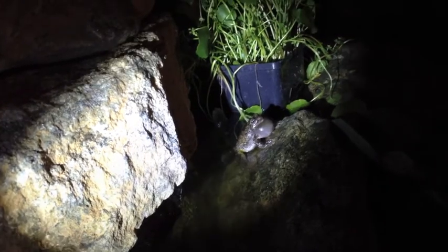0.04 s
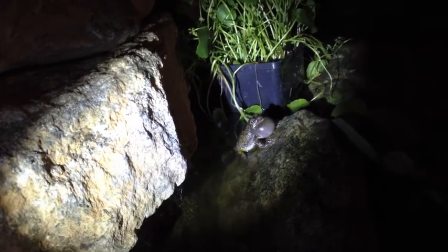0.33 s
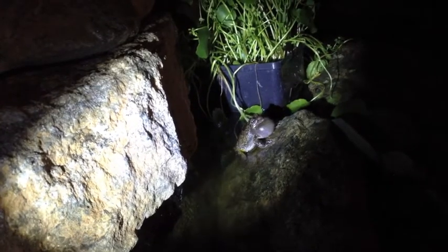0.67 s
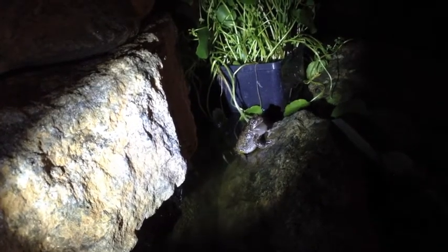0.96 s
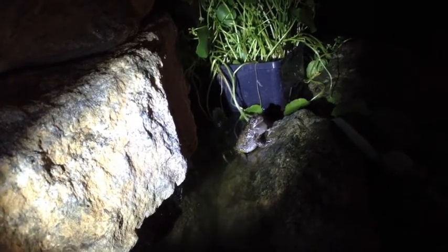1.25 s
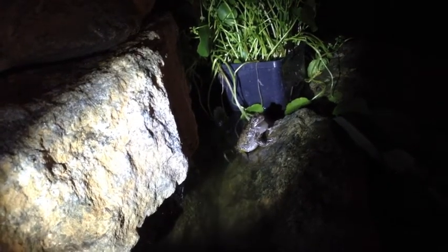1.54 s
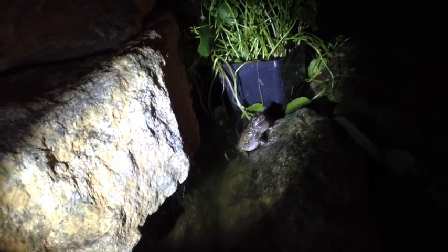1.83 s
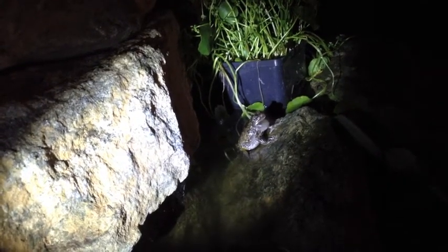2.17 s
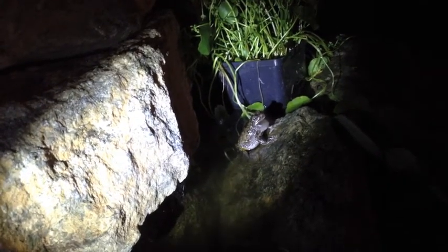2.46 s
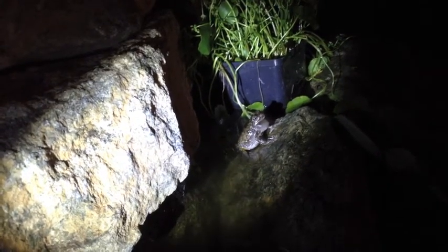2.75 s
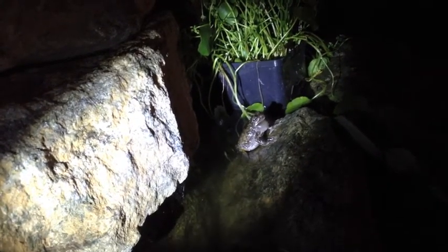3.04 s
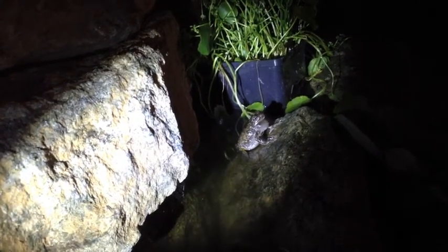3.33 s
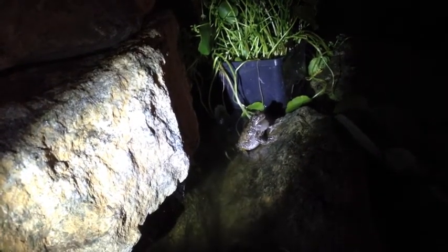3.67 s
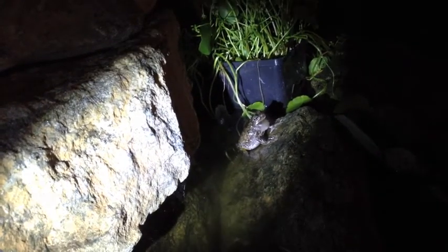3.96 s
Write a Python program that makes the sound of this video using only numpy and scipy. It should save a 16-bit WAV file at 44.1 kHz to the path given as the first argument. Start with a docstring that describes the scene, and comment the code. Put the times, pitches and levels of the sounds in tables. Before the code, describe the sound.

A frog trills loudly close by, two others join, then faint water keeps trickling.

```python
"""Among rocks in a garden at night, on one microphone: a treefrog trills close by, and two farther off
join in and outlast it. Each trill is a train of short pulses, about 48 a second, each an upward chirp
of the vocal cords, its overtones shaped by throat and vocal sac and mirrored by the stones.
Behind the frogs, water trickles, plops and drips faintly in a stony hollow throughout."""
import sys
import numpy as np
from scipy import signal
from scipy.fft import rfft, irfft
from scipy.io import wavfile
from scipy.ndimage import uniform_filter1d

SR = 44100
rng = np.random.default_rng(int(sys.argv[2]) if len(sys.argv) > 2 else 0)


def waveform_to_disk(signal):
    """Save audio, clipped to [-1, 1], as 16-bit WAV at the path in sys.argv[1]."""
    frames = np.transpose(np.atleast_2d(signal))
    scaled = np.clip(frames, -1, 1) * 32767
    samples = np.round(scaled).astype(np.int16)
    wavfile.write(sys.argv[1], SR, samples)


N = 176400


def near_frog():
    """The loud frog close to the microphone, first to call."""
    # Pulse timing and glide (start/s, count; the rest in ms or Hz as named)
    call = dict(start=-.0011, period_ms=20.2, slowing_ms=.045, count=32, late_ms=0, from_hz=1088, to_hz=1404, attack_ms=3.37, hold_ms=7.6, release_ms=.7)
    # Effort through the trill (t/s, level/dB)
    effort = [(0, -18.5), (0.022, -5.5), (0.041, -3), (.13, -4), (.42, -7), (.53, -8), (.65, -6)]
    # Response of throat and vocal sac (f/Hz, level/dB)
    throat = [(830, -35.5), (1020, -14), (1200, -19.5), (1400, -12.5), (1850, -4), (2150, -0.5),
              (2800, -1.5), (3080, -45.5), (3350, -35), (3680, -15), (4300, -40.5), (5000, -24.5),
              (5900, -23), (6200, -35.5), (7050, -26.5), (8400, -29), (9200, -41), (10500, -43),
              (12900, -58.5), (13900, -35.5), (14600, -55.5)]
    # Reflections off the nearest stones (delay/ms, share)
    stones = [(3.64, .48), (4.29, .4)]
    return stone_echoes(trill(call, effort, throat, rasp_db=-26.5, body_db=-25), stones)


def high_frog():
    """A higher, quicker frog farther off, second to call."""
    # Pulse timing and glide (start/s, count; the rest in ms or Hz as named)
    call = dict(start=.3145, period_ms=19.6, slowing_ms=.014, count=38, late_ms=0, from_hz=1190, to_hz=1469.5, attack_ms=1.5, hold_ms=8.04, release_ms=0.49)
    # Effort through the trill (t/s, level/dB)
    effort = [(.31, -18.5), (0.379, -17.5), (.62, -17.5), (.7, -19.5), (.97, -18), (1.05, -19)]
    # Response of throat and vocal sac (f/Hz, level/dB)
    throat = [(900, -26), (1150, -14), (1350, 0), (1500, 3), (1780, -17.5), (2300, -3), (2900, 3.5),
              (3330, -32), (3900, -16.5), (4600, -25.5), (5300, -46), (7000, -57), (8600, -48.5),
              (9100, -23), (9700, -83.5)]
    # Reflections off the nearest stones (delay/ms, share)
    stones = [(2.3, 0.13), (8.2, 0.082)]
    return stone_echoes(trill(call, effort, throat, rasp_db=-48, body_db=-46), stones)


def low_frog():
    """A lower, slower frog, also farther off, last to start and stop."""
    # Pulse timing and glide (start/s, count; the rest in ms or Hz as named)
    call = dict(start=.4794, period_ms=21.5, slowing_ms=.045, count=33, late_ms=6.6, from_hz=1026, to_hz=1364, attack_ms=3.28, hold_ms=8.2, release_ms=1.1)
    # Effort through the trill (t/s, level/dB)
    effort = [(0.479, -20), (.7, -21.5), (.8, -19), (1.1, -18.5), (1.17, -16.5), (1.197, -24)]
    # Response of throat and vocal sac (f/Hz, level/dB)
    throat = [(850, -34.5), (1100, -8), (1350, 1), (1770, -27), (2100, 1), (2700, 1), (3170, -42),
              (3700, -12.5), (4500, -35), (5000, -31.5), (6000, -48), (7700, -46.5), (8250, -34),
              (9000, -64)]
    # Reflections off the nearest stones (delay/ms, share)
    stones = [(2.205, 0.43), (10.588, 0.12)]
    return stone_echoes(trill(call, effort, throat, rasp_db=-37.5, body_db=-58), stones)


def trill(call, effort, throat, rasp_db, body_db):
    """A slowly slackening train of pulses; in each the vocal cords start, glide upward and stop."""
    # Spectrum of the turbulent rasp within each pulse (f/Hz, level/dB)
    turbulence = [(200, -34), (830, -22), (1000, -4), (1650, 3), (2600, -6), (3150, -19.5), (3800, -4.5),
                  (8400, -14.5), (10000, -28), (15000, -37)]
    glide_ms, body_hz, body_decay_ms = 10.6, 1052, 5.2
    k = np.arange(call["count"])
    jitter_ms, detune, jitter_db = (rng.standard_normal((len(k), 3)) * [.051, .011, .72]).T
    cold = np.exp(-k / 2.18)  # until the frog warms up, pulses are flat in pitch and open late
    beats_ms = call["period_ms"] * k + call["slowing_ms"] * k ** 2 / 2 + jitter_ms
    beats_ms[-1] += call["late_ms"]
    onsets = call["start"] + beats_ms / 1000
    t = np.arange(int((onsets[-1] + .02) * SR)) / SR
    pulse = np.maximum(np.searchsorted(onsets, t) - 1, 0)
    age_ms = np.maximum(t - onsets[pulse], 0) * 1000

    glide = np.interp(age_ms, [0, glide_ms], [call["from_hz"], call["to_hz"]])
    hz = glide * (1 - .11 * cold + detune)[pulse]
    turns = np.cumsum(hz) / SR
    phase = 2 * np.pi * (turns - np.interp(onsets, t, turns)[pulse])  # restarts with each pulse

    size = undb(curve(onsets, effort) + jitter_db)[pulse]
    open_ms = age_ms - 3.6 * cold[pulse] ** 2
    opening = size * np.sin(np.pi / 2 * np.clip(open_ms / call["attack_ms"], 0, 1)) ** 2
    closing_ms = np.logaddexp(0, 3 * (age_ms - call["hold_ms"])) / 3
    drive = opening * np.exp(-closing_ms / call["release_ms"])

    tone = drive * sum(np.sin(n * phase) for n in range(1, 4))
    harsh = undb(1.5 * (np.exp(-((age_ms - 6.5) / 1.24) ** 2) - 1.5))  # a brief lift 6.5 ms in
    flutter = .11 * walk(per_s=1800)[:len(t)]  # the cords flutter and roughen the high overtones
    buzz = drive * harsh * sum(np.sin(n * (phase + flutter)) for n in range(4, 13))
    ring = undb(-10) * tail(buzz, t60_s=.06)[:len(t)]  # they ring on between pulses
    sac = shaped(tone + buzz + ring, throat)
    rasp = undb(rasp_db) * drive * colour(rng.standard_normal(N), turbulence)[:len(t)]
    # Each pulse also sets the frog's body ringing
    body_ring = np.exp(1 - age_ms / body_decay_ms) * np.sin(2 * np.pi * body_hz * age_ms / 1000)
    body = undb(body_db) * opening * body_ring
    return sac + np.pad(rasp + body, (0, N - len(t)))


def stone_echoes(x, echoes):
    """The direct sound plus delayed copies off small stones, which return little bass or treble."""
    low_hz, high_hz = 1463, 5460
    hz = np.arange(N + 1) * SR / (2 * N)
    returned = hz ** 4 / (hz ** 4 + low_hz ** 4) / (1 + (hz / high_hz) ** 4)
    copies = sum(share * np.exp(-2j * np.pi * hz * ms / 1000) for ms, share in echoes)
    return irfft(rfft(x, 2 * N) * (1 + returned * copies), 2 * N)[:N]


def trickle():
    """Water behind the frogs: wash and spray, with bubbles and drips that ring in a stony hollow."""
    # Loudness of the water over time, dipping a little and then slowly rising (t/s, level/dB)
    water_levels = [(0, -0.36), (1.4, -2.07), (2.3, -0.48), (3.3, 0.57), (4, 2)]
    water_gain = undb(curve(np.arange(N) / SR, water_levels))
    hiss = water_gain * (wash() + spray())
    drops = water_gain * small_bubbles() + plops() + drips()
    hollow = undb(-2) * tail(drops, t60_s=.063)
    return hiss + drops + gurgle(drops) + hollow


def plops():
    """Single bubbles that stand clear of the trickle."""
    # Plops (t/s, relative level/dB, f/Hz)
    events = [(.147, -31, 700), (.28, -33, 715), (1.311, -37, 756), (2.023, -41.5, 763), (2.28, -31, 1380),
              (2.294, -38.5, 765), (2.337, -34.5, 772), (2.577, -40.5, 710), (2.598, -35.5, 720),
              (2.656, -37.5, 1440), (2.895, -38, 1050), (3.016, -38.5, 754), (3.06, -39.5, 775),
              (3.14, -36, 708), (3.18, -38, 834), (3.226, -40, 785), (3.3, -39.5, 755), (3.345, -34.5, 712),
              (3.58, -28, 2600), (3.67, -37, 660), (3.693, -36.5, 783), (3.759, -40, 790),
              (3.878, -35, 1510), (3.924, -27.5, 2480)]
    return undb(-2) * bubbles(events)


def small_bubbles():
    """Faint bubbles at random times in three pitch ranges, a few much louder than the rest."""
    # Bubble swarms (rate/s^-1, lowest f/Hz, highest f/Hz, base level/dB)
    swarms = [(40, 660, 980, -56), (85, 1300, 2600, -57), (60, 1900, 4600, -53)]
    out = np.zeros(N)
    for rate, low_hz, high_hz, base_db in swarms:
        when, pitch, size = rng.random(size=(600, 3))[:int(rate * N / SR)].T
        db = base_db - 3.8 * np.log(np.maximum(size, .05))
        out += bubbles(zip(when * N / SR, db, low_hz * (high_hz / low_hz) ** pitch))
    return out


def bubbles(rows):
    """Each bubble (t/s, level/dB, f/Hz) rings for a few cycles and rises in pitch."""
    decay_cycles, rise, attack_s = 5.63, .019, .001
    out, t = np.zeros(N + SR), np.arange(SR // 12) / SR
    for start, db, hz in rows:
        life = t * hz / decay_cycles
        envelope = (1 - np.exp(-t / attack_s)) * np.exp(-life)
        phase = 2 * np.pi * hz * t * (1 + rise * (np.minimum(life, 10) - 1) / 2)
        i = int(max(start, 0) * SR)
        out[i:i + len(t)] += undb(db) * envelope * np.sin(phase)
    return out[:N]


def drips():
    """Each drip smacks on wet stone: a band of noise that dies in a few milliseconds."""
    # Drips (t/s, level/dB, centre f/Hz)
    events = [(1.384, -48.5, 11000), (1.522, -45, 4740), (1.692, -43, 2170), (1.853, -45.5, 3900),
              (2.022, -44.5, 2900), (2.122, -42.5, 3880), (2.258, -41.5, 5300), (2.819, -44.5, 2460),
              (2.987, -42.5, 4500), (3.239, -43, 2270), (3.301, -43, 2840), (3.687, -44, 3670),
              (3.76, -42.5, 2280), (3.852, -45.5, 5950), (3.88, -38, 5500)]
    attack_s, decay_s, width_hz = .0008, .005, 1500
    out, t = np.zeros(N + SR), np.arange(SR // 20) / SR
    hz = np.fft.rfftfreq(len(t), 1 / SR)
    envelope = (1 - np.exp(-t / attack_s)) * np.exp(-t / decay_s)
    for start, db, centre in events:
        band = hz / (hz + centre) * np.exp(-((hz - centre) / width_hz) ** 2 / 2)
        smack = irfft(rfft(rng.standard_normal(len(t))) * band, len(t))
        i = int(start * SR)
        out[i:i + len(t)] += undb(db) * envelope * smack / np.std(smack)
    return out[:N]


def gurgle(drops):
    """A cavity among the stones booms on after each plop and joins them into a gurgle."""
    cavity_hz, width_hz = 780, 130
    cavity = signal.lfilter(*signal.iirpeak(cavity_hz, cavity_hz / width_hz, fs=SR), drops)
    return undb(-5) * tail(cavity, t60_s=.17)


def wash():
    """The steady noise of running water, its level flickering slightly."""
    # Spectrum of the wash (f/Hz, level/dB)
    spectrum = [(24, -58), (40, -36.5), (103, -4.5), (200, -5.5), (562, -4), (758, 0), (1020, -3),
                (1190, -16.5), (1410, 1), (1860, -15), (2110, -5), (2710, -10), (3300, -10), (3620, -5.5),
                (5440, -10.5), (8310, -9), (9890, -16.5), (14400, -16.5), (15500, -39)]
    return undb(-52.5 + 1.5 * walk(per_s=18)) * colour(rng.standard_normal(N), spectrum)


def spray():
    """Tiny splashes at random times, each a short burst of noise."""
    # Spectrum of the spray (f/Hz, level/dB)
    spectrum = [(500, -8.5), (1400, 1), (2500, -2), (3300, 1), (3620, 5.5), (4500, -5.5), (4950, 4),
                (5700, -5.5), (6700, 1.5), (8400, -0.5), (10000, -8), (15000, -13)]
    per_s, spread_db, decay_s = 280, 3.7, .004
    hits = rng.random(N) < per_s / SR
    splashes = hits * undb(spread_db * np.minimum(rng.exponential(size=N), 4))
    power = signal.lfilter([1], [1, -np.exp(-2 / (decay_s * SR))], splashes ** 2)
    return undb(-57) * colour(np.sqrt(power) * rng.standard_normal(N), spectrum)


def tail(x, t60_s):
    """Diffuse reflections or ringing, dying by 60 dB in t60_s."""
    t = np.arange(SR // 2) / SR
    envelope = np.exp(-np.log(1000) * t / t60_s) * np.minimum(10 * t / t60_s, 1)
    response = rng.standard_normal(len(t)) * envelope
    return signal.fftconvolve(x, response / np.linalg.norm(response))[:N]


def undb(db):
    """Decibels to amplitude."""
    return 10 ** (np.asarray(db) / 20)


def curve(t, rows):
    """Straight lines between the rows."""
    return np.interp(t, *np.array(rows, float).T)


def shaped(x, rows):
    """Filter by a table (f/Hz, level/dB), interpolated over log frequency."""
    f, db = np.array(rows, float).T
    hz = np.arange(N + 1) * SR / (2 * N)
    gain = undb(np.interp(np.log(np.maximum(hz, 1)), np.log(f), db))
    return irfft(rfft(x, 2 * N) * gain, 2 * N)[:N]


def colour(x, rows):
    """Filter by a table (f/Hz, level/dB), to an rms of 1."""
    y = shaped(x, rows)
    return y / np.std(y)


def walk(per_s):
    """A smooth random wander with a spread of 1."""
    step = int(SR / per_s)
    y = uniform_filter1d(np.repeat(rng.standard_normal(N // step + 1), step), step)[:N]
    return y / np.std(y)


def scene():
    """At the microphone: three frogs, their scatter off rocks and garden, and the water behind."""
    frogs = near_frog() + high_frog() + low_frog()
    rocks = undb(-13.5) * tail(frogs, t60_s=.078)
    garden = undb(-22.5) * tail(frogs, t60_s=.38)
    return (frogs + rocks + garden + trickle())[None]


def record(dry):
    """The microphone drops the deep bass and the very top."""
    low_cut_hz, top_hz = 74, 15200
    thin = signal.sosfilt(signal.butter(10, low_cut_hz, "high", fs=SR, output="sos"), dry)
    return signal.sosfilt(signal.ellip(8, .2, 70, top_hz, fs=SR, output="sos"), thin)


dry = scene()
out = record(dry)
waveform_to_disk(out)
```